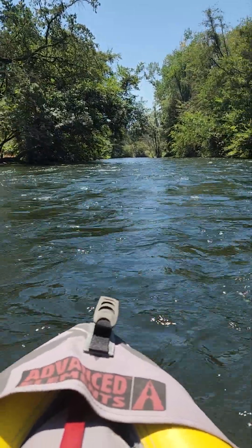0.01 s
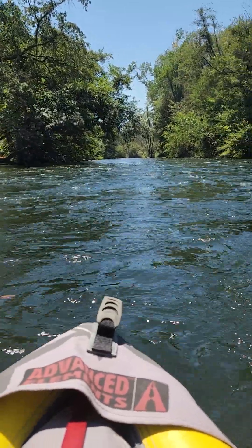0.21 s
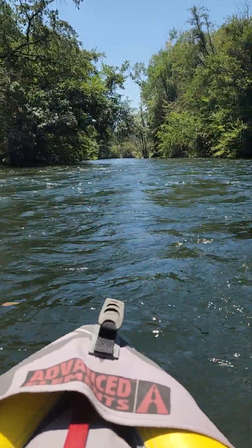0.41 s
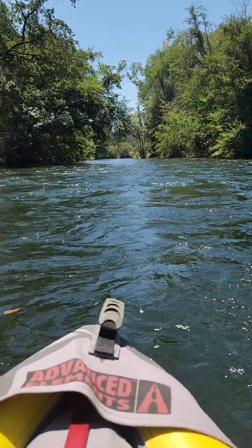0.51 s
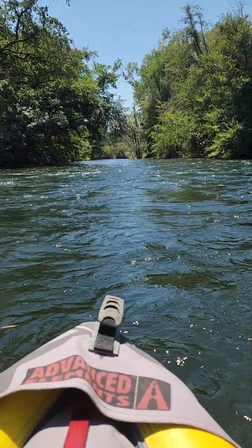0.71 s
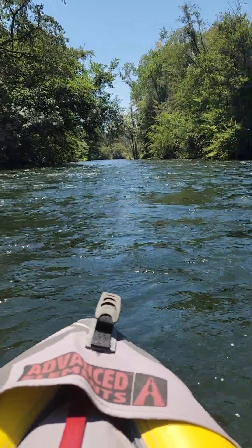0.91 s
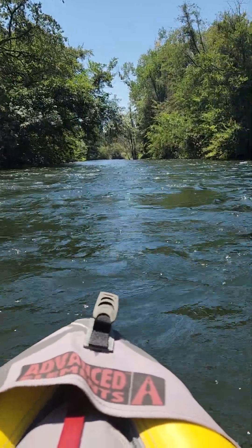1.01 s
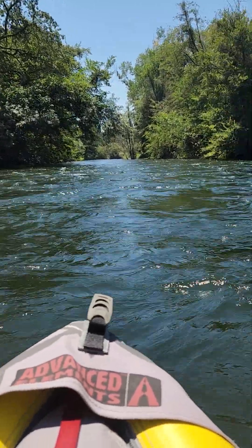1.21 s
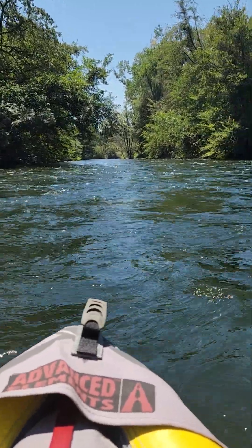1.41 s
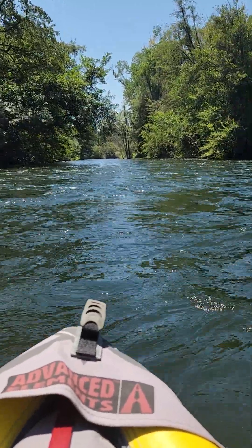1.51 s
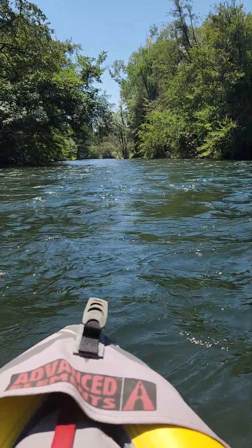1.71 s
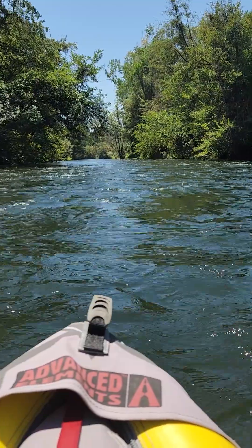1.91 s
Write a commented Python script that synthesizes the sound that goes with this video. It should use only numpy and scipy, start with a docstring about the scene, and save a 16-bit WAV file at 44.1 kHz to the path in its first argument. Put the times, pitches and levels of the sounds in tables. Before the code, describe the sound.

River water slaps and thuds hollowly under an inflatable kayak, with gurgles over a steady rushing current

```python
"""Inflatable kayak on a fast river

An inflatable kayak drifts down a fast river, heard from a phone held over the bow.
Trapped air thuds under the hull as gliding sines, wavelets slap it as bursts of coloured noise,
and cavities gurgle. Spray, drips and ticks are ringing droplets and bright noise.
Behind them the current rushes as flickering noise with bubbles, and the hull rumbles."""
import sys
import numpy as np
from scipy import signal
from scipy.fft import rfft, irfft
from scipy.io import wavfile
from scipy.ndimage import uniform_filter1d

SR = 44100
rng = np.random.default_rng(int(sys.argv[2]) if len(sys.argv) > 2 else 0)


def pcm_store(signal):
    """Save signal as 16-bit PCM."""
    levels = np.round(np.clip(np.atleast_2d(signal), -1, 1) * 32767)
    wavfile.write(sys.argv[1], SR, levels.astype(np.int16).T)


N = 88200  # two seconds of samples

SPLASH_LIKENESS = 0.12  # correlation of left and right in splash, fizz and ticks


def undb(db):
    """Amplitude ratio: twenty decibels make a factor of ten."""
    return 10 ** (np.asarray(db) / 20)


def unit(x):
    """Normalisation: scale to an rms of 1."""
    return x / np.sqrt(np.mean(x ** 2))


def by_freq(points, column=1):
    """Logarithmic pitch: interpolate a table's column over log frequency, onto the spectrum's bins."""
    p = np.array(points, float)
    hz = np.maximum(np.fft.rfftfreq(2 * N, 1 / SR), 1)
    return np.interp(np.log(hz), np.log(p[:, 0]), p[:, column])


def by_time(points):
    """Envelope: gain that follows (s, dB) points, straight in decibels."""
    p = np.array(points, float)
    return undb(np.interp(np.arange(N) / SR, p[:, 0], p[:, 1]))


def colour(x, points, column=1):
    """Minimum-phase filtering: a causal filter with the given (Hz, dB) response."""
    cepstrum = irfft(np.log(undb(by_freq(points, column))))
    # folding the cepstrum onto positive times makes the response causal
    cepstrum[1:N] *= 2
    cepstrum[N + 1:] = 0
    response = np.exp(rfft(cepstrum))
    return irfft(rfft(x, 2 * N) * response)[..., :N]


def pair(likeness):
    """Interchannel correlation: left and right white noise share a middle part and differ by a side part."""
    c = np.clip(likeness, 0, 1)
    mid, side = rfft(rng.standard_normal((2, 2 * N)))
    mid = mid * np.sqrt((1 + c) / 2)
    side = side * np.sqrt((1 - c) / 2)
    return irfft(np.array([mid + side, mid - side]))[:, :N]


def walk(rate):
    """Slow modulation: random steps, about rate per second, smoothed twice and scaled to rms 1."""
    k = max(int(SR / rate), 2)
    steps = np.repeat(rng.standard_normal(N // k + 1), k)
    smooth = uniform_filter1d(uniform_filter1d(steps, k), k)
    return unit(smooth[:N])


def since(start):
    """Local time: seconds since a moment, zero before it."""
    return np.maximum(np.arange(N) / SR - start, 0)


def strike(t, rise, decay):
    """Damped excitation: quick rise, exponential fall."""
    return (1 - np.exp(-t / rise)) * np.exp(-t / decay)


def add(out, start, sound):
    """Superposition: mix a short sound in at a time."""
    i = int(np.clip(start * SR, 0, N - 1))
    out[:, i:i + sound.shape[-1]] += sound[..., :N - i]


def thuds():
    """Cavity resonance: trapped air rings with a sliding, wobbling pitch as the pocket spreads; the skin flutters."""
    # Air pockets under the hull. Each row: start in seconds, first and last pitch in Hz,
    # level in dB, decay in seconds, left minus right in dB.
    pockets = [(0.207, 138, 119.6, -18, 0.028, -2.5), (.321, 155, 62.4, -16, 0.06, -1.5),
               (0.3997, 156, 114, -6.5, 0.0097, 7.5), (0.411, 117.4, 64, -3.5, 0.02, -5.5),
               (.468, 168, 103.6, -16, 0.022, 1.5), (0.634, 160, 163, -20.5, 0.018, 3),
               (0.751, 119, 98, -26.5, 0.019, 5), (0.817, 134, 85.6, -16, 0.015, 0),
               (0.927, 196, 145.8, -15.5, 0.034, 1.5), (.964, 122, 72.6, -16, 0.0097, 1),
               (1.351, 116, 66.4, -16, 0.0058, 2), (1.611, 138, 144.7, -29.5, 0.035, -2),
               (1.653, 137, 112, -26.5, 0.012, -2), (1.728, 147, 117.5, -26, 0.03, -4)]
    # Colour of the skin's flutter. Each row: frequency in Hz, relative level in dB.
    flutter_colour = [(30, -20.5), (70, -1), (160, 3.5), (230, -2.5), (390, -5), (470, -37), (650, -13.5),
                      (2000, -43), (8000, -64)]
    rise_s, sag_s = 0.0028, 0.016  # time constants of the onset and of the pitch slide
    flutter_gain, flutter_likeness = .22, .21
    wobble = 1 + .055 * walk(150)
    ring, swell = 0, 0
    for start, first_hz, last_hz, db, decay, pan_db in pockets:
        t = since(start)
        hz = (last_hz + (first_hz - last_hz) * np.exp(-t / sag_s)) * wobble
        side_db = pan_db * np.array([[.5], [-.5]])
        env = undb(db + side_db) * strike(t, rise_s, decay)
        phase = 2 * np.pi * np.cumsum(hz * (t > 0)) / SR
        ring = ring + env * np.sin(phase)
        swell = swell + env
    flutter = unit(colour(pair(flutter_likeness), flutter_colour))
    return ring + flutter_gain * swell * flutter


def slaps():
    """Impact noise: each wavelet gives a hollow slosh and a brighter splash that breaks into droplet clusters."""
    # Wavelets on the bow. Each row: start in seconds, slosh level in dB, splash level in dB, decay in seconds.
    wavelets = [(0.193, -30.5, -69, 0.022), (0.315, -17.5, -24, 0.009), (.388, -23, -24, 0.013),
                (0.3986, -16, -17.5, 0.0019), (0.4045, -16, -29, 0.0097), (0.4613, -18.5, -23, 0.0087),
                (0.543, -51, -24, 0.0058), (0.623, -55, -24.5, 0.0087), (0.795, -24.5, -40, 0.023),
                (.8832, -21, -9.5, .0015), (0.9203, -21, -45, 0.015), (0.927, -17.5, -40, 0.0043),
                (1.194, -25.5, -32, 0.028)]
    # Colours of the two parts. Each row: frequency in Hz, relative level in dB.
    slosh_colour = [(100, -11.5), (200, -0.5), (265, -2), (310, -0.5), (390, 1), (470, -7), (620, -6),
                    (1200, -22), (2500, -22.5), (14000, -77)]
    splash_colour = [(300, -23.5), (900, 1), (1700, 2), (2600, -6), (4600, -6), (5500, -7.5), (8000, -23.5),
                     (15000, -55)]
    rise_s, slosh_likeness = .0012, .44
    grain_db, grains_per_s = 4, 700
    slosh_env, splash_env = 0, 0
    for start, slosh_db, splash_db, decay in wavelets:
        env = strike(since(start), rise_s, decay)
        slosh_env = slosh_env + undb(slosh_db) * env
        splash_env = splash_env + undb(splash_db) * env
    grainy = pair(SPLASH_LIKENESS) * undb(grain_db * walk(grains_per_s))
    slosh = slosh_env * unit(colour(pair(slosh_likeness), slosh_colour))
    splash = splash_env * unit(colour(grainy, splash_colour))
    return slosh + splash


def gurgles():
    """Gliding resonance: larger cavities beside the boat ring briefly, unsteady in pitch and strength."""
    # Single gurgles and plops. Each row: start in seconds, first and last pitch in Hz,
    # length in seconds, level in dB.
    cavities = [(0.169, 390, 588, 0.054, -32.5), (0.202, 513, 830, 0.039, -30.5),
                (0.313, 341, 590, 0.032, -25), (0.4055, 1782, 1660, 0.0066, -15),
                (0.436, 960, 890, 0.019, -36), (0.51, 340, 386, 0.052, -35),
                (0.581, 1082, 1464, 0.021, -29.5), (0.663, 370, 372, 0.067, -36.5),
                (.767, 327, 363, .023, -33), (.787, 436, 650, 0.034, -29.5),
                (0.868, 978, 705, 0.0712, -32.5), (1.044, 991, 1040, 0.021, -32.5),
                (1.378, 350, 503, 0.02, -39), (1.656, 825, 1040, 0.04, -32),
                (1.947, 1950, 1980, 0.026, -37), (1.98, 2550, 2710, 0.012, -31.5)]
    waver, rough_db = .027, 2  # rms unsteadiness of pitch (fraction) and level (dB)
    out = np.zeros((2, N))
    for start, first_hz, last_hz, length, db in cavities:
        u = np.clip(since(start) / length, 0, 1)  # progress, 0 to 1
        hz = first_hz * (last_hz / first_hz) ** u * (1 + waver * walk(250))
        env = undb(db + rough_db * walk(250)) * np.sin(np.pi * u)
        out += env * np.sin(2 * np.pi * np.cumsum(hz) / SR)
    return out


def drips():
    """Bubble resonance: a nearer drop leaves one tiny ringing bubble as it lands."""
    # Nearer drops. Each row: start in seconds, pitch in Hz, level in dB.
    drop_table = [(0.318, 4590, -24), (.548, 3220, -22.5), (.594, 3960, -24.5), (.679, 4290, -27.5),
                  (.724, 4980, -31), (.884, 3520, -27), (1.764, 4060, -34), (1.962, 6500, -34)]
    decay_cycles = 11
    out = np.zeros((2, N))
    for start, hz, db in drop_table:
        t = since(start)
        env = undb(db) * strike(t, 1 / hz, decay_cycles / hz)
        out += env * np.sin(2 * np.pi * hz * t)
    return out


def ticks():
    """Transient noise: single fine droplets burst on the bow with a short, bright tick."""
    # Droplets on the bow. Each row: start in seconds, level in dB.
    bursts = [(.464, -34), (.551, -26.5), (.602, -39), (.616, -35), (0.658, -39), (0.677, -33), (0.75, -33),
              (1.401, -36), (1.501, -37), (1.959, -36)]
    # Colour of a tick. Each row: frequency in Hz, relative level in dB.
    tick_colour = [(1500, -10), (6500, 0), (13000, -7), (16000, -22)]
    decay_s = .0016
    env = sum(undb(db) * strike(since(start), decay_s / 10, decay_s) for start, db in bursts)
    return env * unit(colour(pair(SPLASH_LIKENESS), tick_colour))


def bubbles(low_hz, high_hz, cycles, spread_db, count):
    """Bubble resonance: many small bubbles ring and rise in pitch, scattered left and right."""
    glide = 0.134  # pitch rises by twice this fraction over a bubble's life
    out = np.zeros((2, N))
    for when, pitch, size, life, place, lag in rng.random((count, 6)):
        hz = low_hz * (high_hz / low_hz) ** pitch
        decay = cycles * (.5 + life) / hz
        # computed until the decay has fallen by 40 dB
        t = np.arange(int(np.log(100) * decay * SR) + 2) / SR
        phase = 2 * np.pi * hz * t * (1 + glide * t / t[-1])
        # many weak bubbles, few strong ones; gain in proportion to pitch
        gain = undb(-spread_db * np.log(1 - .98 * size)) * hz
        left = np.sqrt(place) * np.sin(phase)
        right = np.sqrt(1 - place) * np.sin(phase + np.pi * (lag - .5))
        add(out, when * N / SR, gain * strike(t, .5 / hz, decay) * np.array([left, right]))
    return out


def spray():
    """Summed droplet impacts: fine droplets patter on the water and their foam fizzes, strongest near 0.6 s."""
    # Level of the falling spray. Each row: time in seconds, level in dB.
    spray_level = [(0, -46.5), (.3, -50), (.52, -44.5), (.59, -39.5), (.66, -41.5), (.71, -45),
                   (.76, -42.5), (.86, -49.5), (1.2, -47.5), (1.42, -48.5), (1.85, -68), (1.97, -47.5)]
    # Colour of droplets and fizz. Each row: frequency in Hz, relative level in dB.
    spray_colour = [(800, -13), (2000, -3.5), (4000, 8), (6500, -2), (9000, -8), (13000, -9.5),
                    (16000, -26)]
    fizz_db = -4  # relative to the droplets
    patter = bubbles(2040, 14700, cycles=3, spread_db=2.8, count=2600)
    patter = unit(colour(patter, spray_colour))
    fizz = unit(colour(pair(SPLASH_LIKENESS), spray_colour))
    return unit(patter + undb(fizz_db) * fizz) * by_time(spray_level)


def current():
    """Turbulence noise: the wash of the whole river flickers octave by octave, with nearer bubbles on top."""
    # Colour of the open current. Each row: frequency in Hz, relative level in dB.
    current_colour = [(100, -8), (220, -2), (400, -1), (700, 0.87), (1100, 0.2), (1500, 1), (2300, -5),
                      (4400, -14), (8000, -23), (15500, -37)]
    # Likeness of left and right. Each row: frequency in Hz, correlation from 0 to 1.
    wash_likeness = [(200, 0.71), (640, 0.84), (1100, 0.82), (1500, 0.16), (3100, 0.095), (7000, 0.073),
                     (15000, .05)]
    # Strength of the current over time. Each row: time in seconds, relative level in dB.
    flow = [(0, -0.5), (.3, 1.5), (.6, 2), (.9, 2), (1.1, 0.5), (1.4, 1.5), (1.7, 1.5), (1.9, 0), (2, 0)]
    rush_db, bubble_db = -36.5, -42  # rms before the flow's rise and fall
    wash = rfft(colour(pair(by_freq(wash_likeness)), current_colour), 2 * N)
    octave = np.log2(np.maximum(np.fft.rfftfreq(2 * N, 1 / SR), 100) / 100)  # octaves above 100 Hz
    rush = 0
    for k in range(9):
        # triangular bands that overlap and sum to one
        band = irfft(wash * np.maximum(1 - abs(octave - k), 0))[:, :N]
        flicker_db = 0.73 * walk(16.0) + 0.16 * walk(80)
        rush = rush + band * undb(flicker_db)
    near = bubbles(329.7, 8270, cycles=9.2, spread_db=2.6, count=1100)
    near = colour(near, current_colour)
    return (undb(rush_db) * unit(rush) + undb(bubble_db) * unit(near)) * by_time(flow)


def rumble():
    """Flow-induced noise: low, steady buffeting as water pushes along the soft hull."""
    # Colour of the buffeting. Each row: frequency in Hz, relative level in dB.
    rumble_colour = [(15, -37), (30, -2.5), (58, 6.5), (90, -2), (135, -3.5), (220, -21), (500, -47),
                     (4000, -81)]
    likeness, level_db = .91, -40
    return undb(level_db) * unit(colour(pair(likeness), rumble_colour))


def scene():
    """Superposition: river and boat together."""
    return current() + rumble() + thuds() + slaps() + gurgles() + spray() + drips() + ticks()


def record(dry):
    """Transducer response: each microphone has its own resonances, the right one duller; the top is cut."""
    # The phone's two microphones. Each row: frequency in Hz, left response in dB, right response in dB.
    microphones = [(71, 1.5, 2), (149, 3, -1.5), (260, -4, -3.5), (388, -1, 0.5), (472, -5, -9.5),
                   (515, -0.5, -3), (980, -1.5, -1), (1422, 0, -2.5), (1580, 4.5, 7.5), (1598, 0.5, 8),
                   (2000, 5.5, -12), (2053, 6.5, -8.5), (3030, -7, -12.5), (3210, -3, -22.5),
                   (4040, -1.5, -11), (4450, -1, -22), (4850, -3.5, -5.5), (5270, -8.5, -20.5),
                   (7230, 0, -8), (7900, -0.5, -14.5), (9150, -8.5, -10.5), (10810, -1, -40),
                   (11000, -20, -52), (12800, -5, -14.5), (15500, -5, -58)]
    top_hz = 15750
    heard = np.array([colour(dry[k], microphones, column=k + 1) for k in range(2)])
    # low-pass of order 10: 0.2 dB passband ripple, 80 dB stopband loss
    low_pass = signal.ellip(10, .2, 80, top_hz, fs=SR, output="sos")
    return signal.sosfilt(low_pass, heard)


dry = scene()
out = record(dry)
pcm_store(out)
```